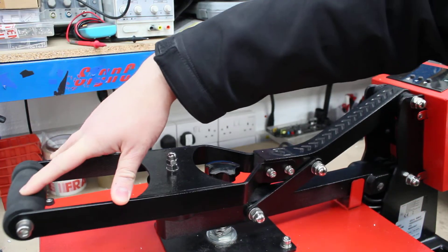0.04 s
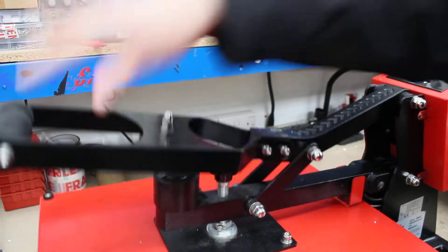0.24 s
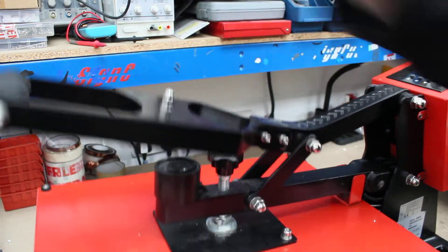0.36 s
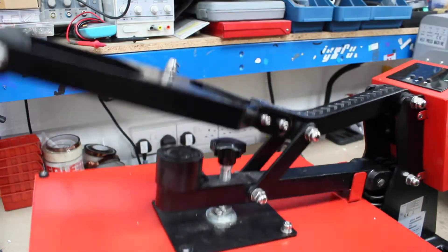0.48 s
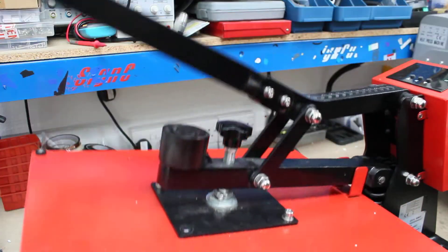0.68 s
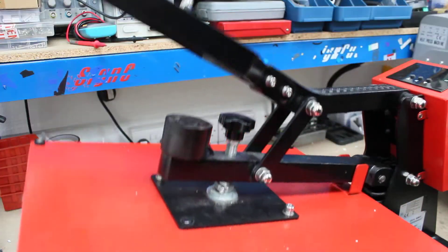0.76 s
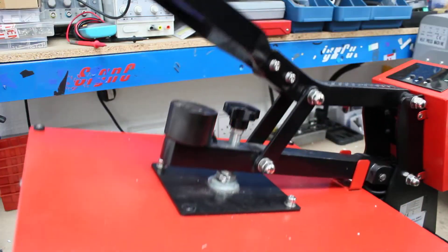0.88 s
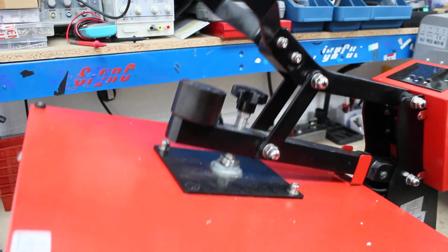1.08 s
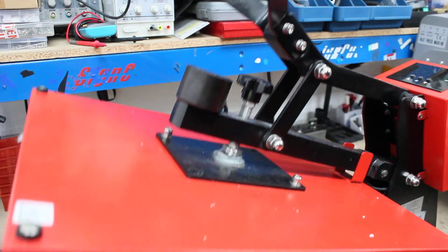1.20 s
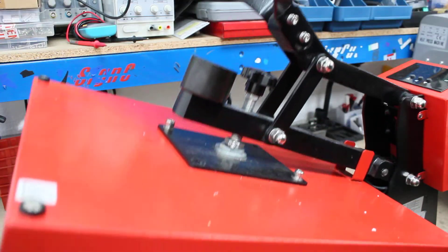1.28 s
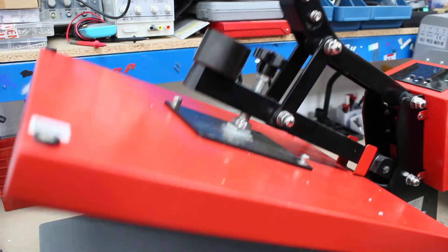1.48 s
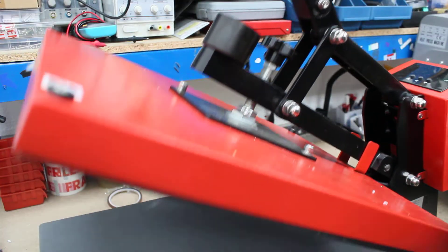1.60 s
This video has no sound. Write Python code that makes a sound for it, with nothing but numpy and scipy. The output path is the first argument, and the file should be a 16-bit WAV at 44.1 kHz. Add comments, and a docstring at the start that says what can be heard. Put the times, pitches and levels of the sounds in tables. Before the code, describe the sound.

A heat press springs open with a loud metal clunk, then lighter clicks and knocks.

```python
"""A heat press opening

A clamshell heat press opens close to the microphone in a small workshop. The handle's linkage
slips and snaps over centre; the impact excites the modes of the steel frame, and the clunk clips.
The rising handle clicks, squeaks and knocks at its pivots while the struts lift the platen with
a hiss and faint falling whistles."""
import sys
import numpy as np
from scipy import signal
from scipy.fft import rfft, irfft
from scipy.io import wavfile

SR = 44100
rng = np.random.default_rng(int(sys.argv[2]) if len(sys.argv) > 2 else 0)


def dump(signal):
    """Clip the signal to [-1, 1] and save it as 16-bit WAV at the path in sys.argv[1]."""
    limited = np.clip(np.atleast_2d(signal).T, -1, 1)
    pcm = np.round(limited * 32767).astype(np.int16)
    wavfile.write(sys.argv[1], SR, pcm)


N = 72765
T = np.arange(N) / SR

# Noise spectra of the workshop air, strut hiss, pivot friction and frame groan.
# Each row: frequency in Hz, relative spectral density in dB.
AIR_SPECTRUM = [(20, 9), (45, -7.5), (110, 1), (300, -0.5), (700, -4.5), (1500, -12.5), (4000, -28.5),
                (8000, -38), (16000, -29)]
HISS_SPECTRUM = [(200, -22), (2500, 3), (5000, -1), (6500, -0.5), (6950, 6), (7400, -1.5), (8500, 0.5),
                 (9000, 3), (9700, -2), (10800, -3), (11800, 0), (16000, -8.5)]
RUB_SPECTRUM = [(50, -44), (150, -3.5), (320, 1), (600, -8), (1100, -6), (2800, -12), (5000, -18),
                (16000, -49.5)]
GROAN_SPECTRUM = [(40, -29), (80, 8), (170, 7), (300, -12), (600, -16), (3000, -53)]
# Envelopes of the last three. Each row: time in seconds, level in dB.
HISS_LEVEL = [(0, -68), (.2, -63), (.42, -59.5), (.58, -54), (.8, -55), (1.05, -59), (1.22, -57.5),
              (1.35, -59), (1.65, -57)]
RUB_LEVEL = [(0, -53.5), (.11, -57.5), (.14, -53.5), (.19, -45.5), (.3, -40), (.56, -50.5), (.62, -48),
             (.73, -46.5), (.79, -50), (.84, -54), (.92, -57), (1.3, -57), (1.5, -53), (1.65, -53.5)]
GROAN_LEVEL = [(.15, -62), (.17, -56), (.194, -37.5), (.202, -22), (.212, -31), (.23, -67)]

# Strut whistles. Each row: midpoint in seconds, length in seconds, pitch in Hz, level in dB.
WHISTLES = [(.62, .14, 12150, -66), (.835, .12, 5230, -58.5), (1.01, .16, 4690, -67),
            (1.145, .09, 4380, -58), (1.18, .12, 11750, -65), (1.235, .13, 4210, -60),
            (1.23, .16, 12600, -65), (1.345, .11, 3990, -62), (1.445, .15, 3770, -61.5),
            (1.61, .16, 3500, -61), (.99, .16, 14350, -71)]
# Course of the pivot squeak. Each row: time in seconds, pitch in Hz, level in dB.
SQUEAK_PATH = [(.61, 3186, -60), (.62, 3060, -45.5), (.628, 2904, -53), (.645, 2860, -55),
               (.665, 2880, -41), (.673, 2820, -50), (.68, 2630, -50), (.69, 2450, -68)]
# Slips of the linkage, then its blows. Each row: start in seconds, relative level in dB.
SLIPS = [(.172, -30), (0.1805, -30), (0.1968, -46)]
BLOWS = [(0.1981, -24.5), (0.2002, -21), (0.2038, 0.5), (.2066, -5)]

# Normal modes of the link pin, handle, hinge and steel frame.
# Each row: frequency in Hz, relative level in dB, time to decay by 60 dB (T60) in seconds.
PIN_MODES = [(1930, -16, 0.15), (3070, -12, 0.12), (3550, -8, 0.12), (4180, -11, 0.08), (5070, -1, 0.056),
             (6620, 2, 0.029), (7350, -2, 0.036), (8090, -21, 0.046), (9560, -1, 0.047)]
HANDLE_MODES = [(291, -8.5, 0.15), (1060, -5.5, .17), (3070, -7.5, .07), (3343, -0.5, 0.042),
                (3570, -4, 0.089), (3850, -12, .06)]
HINGE_MODES = [(273, -0.5, 0.14), (1002, -12.5, 0.18), (1590, -18, 0.094), (1847, -10, 0.079),
               (2215, -8, 0.11), (3210, -0.5, 0.062), (3415, -7, 0.054)]
FRAME_MODES = [(78.5, -33, 0.75), (208.5, -9, 0.17), (277, -19, 0.12), (366.6, -10.5, 0.075),
               (437, -28, 0.5), (484, -17, 0.08), (686.7, -19.5, 0.09), (790.4, -10.5, 0.0614),
               (931, -8, 0.075), (986, -19.5, 0.21), (1174, -18, 0.061), (1350, -17, 0.061),
               (1568, -20, 0.17), (1760, -6.5, 0.035), (2056, -11.5, 0.031), (2615, -22, 0.1),
               (3510, -23, 0.046), (4266, -15.5, 0.032), (4607, -17, 0.022), (6880, -26, 0.035)]

# Dense responses of the room, the three joints, a slip, a blow's first crack and the frame's covers.
# Each row: frequency in Hz, relative spectral density in dB, T60 in seconds.
ROOM_BANDS = [(50, 9, 0.99), (119, 8, 0.28), (288, -1.5, 0.42), (1000, -0.5, 1), (1990, -6.5, 1),
              (4500, -8, 0.73), (8000, 5, 0.16), (16000, 6.5, 0.2)]
PIN_BANDS = [(200, -16, .05), (1500, -11.5, 0.11), (2800, -5, 0.15), (5000, -4.5, 0.099),
             (9900, -0.5, 0.045), (11500, -13, 0.059), (16200, -8.5, .04)]
HANDLE_BANDS = [(150, -21, .1), (1160, -4, 0.13), (1990, -10, 0.14), (3480, 4, 0.1), (4800, -16, .06),
                (16000, -22, .04)]
HINGE_BANDS = [(130, -37, 0.087), (282, 5.5, 0.2), (600, -1.5, 0.32), (1190, -2, 0.19), (2610, -7.5, 0.18),
               (3400, -2, 0.12), (4650, -10.5, 0.1), (6500, -29, 0.055), (16000, -40, 0.05)]
SLIP_BANDS = [(60, -4, .1), (300, -18, .1), (1200, -9, 0.11), (4440, -1.5, 0.085), (6300, -2.5, 0.054),
              (7950, 8.5, 0.039), (9800, -8, 0.075), (12500, -9, 0.091), (16000, -20, .05)]
CRACK_BANDS = [(60, -18, 0.03), (302, -7, 0.018), (1770, -1, 0.035), (3060, -6, 0.0095), (4440, 0, 0.02),
               (6000, -27, 0.0094), (16000, -50, 0.0071)]
CLATTER_BANDS = [(40, -28, .15), (130, -0.5, 0.21), (370, 1, 0.14), (700, -0.5, 0.12), (1220, -0.5, 0.064),
                 (2770, -18, 0.12), (4500, -8.5, 0.059), (6450, -15.5, 0.056), (10200, -25, 0.038),
                 (12400, -24, 0.067), (16000, -49, .04)]


def amp(db):
    """Amplitude grows tenfold for every 20 dB."""
    return 10 ** (np.asarray(db) / 20)


def unit(x):
    """Normalisation to an rms of 1."""
    return x / np.sqrt(np.mean(x ** 2) + 1e-20)


def curve(rows, column=1):
    """Linear interpolation of one column over time."""
    rows = np.array(rows)
    return np.interp(T, rows[:, 0], rows[:, column])


def over_hz(rows, values):
    """Interpolation of one value per row over log frequency."""
    hz = np.fft.rfftfreq(N, 1 / SR)
    return np.interp(np.log(hz + 1), np.log([row[0] for row in rows]), values)


def noise(rows):
    """Random phases under a given spectrum sum to noise, here of rms 1."""
    gain = amp(over_hz(rows, [row[1] for row in rows]))
    return unit(irfft(gain * np.exp(2j * np.pi * rng.random(len(gain))), N))


def wander(rate_hz):
    """Low-passed noise gives a random fluctuation of rms 1."""
    hz = np.fft.rfftfreq(N, 1 / SR)
    return unit(irfft(rfft(rng.standard_normal(N)) / (1 + (hz / rate_hz) ** 4), N))


def tone(hz):
    """A sine of rms 1 whose phase is the integral of its frequency."""
    return np.sqrt(2) * np.sin(2 * np.pi * np.cumsum(hz) / SR)


def delayed(x, start_s):
    """A shift in time to a later onset."""
    return np.concatenate([np.zeros(round(start_s * SR)), x])[:N]


def ring(modes):
    """Free vibration is a sum of damped modes, here of alternating sign."""
    return sum((-1) ** k * amp(db - 60 * T / t60) * np.sin(2 * np.pi * hz * T)
               for k, (hz, db, t60) in enumerate(modes))


def dense_ring(rows):
    """Overlapping modes merge into noise, each band decaying at its own rate."""
    spectrum = rfft(noise(rows))
    return sum(irfft(spectrum * over_hz(rows, band), N) * amp(-60 * T / t60)
               for band, (_, _, t60) in zip(np.eye(len(rows)), rows))


def air(hum_hz=114, width_hz=8.7):
    """Steady room noise carries a low hum, spread into a narrow band by random modulation."""
    phase = 2 * np.pi * hum_hz * T
    hum = unit(wander(width_hz) * np.cos(phase) + wander(width_hz) * np.sin(phase))
    return amp(-51) * noise(AIR_SPECTRUM) + amp(-61) * hum


def room(x, rise_s=.0064):
    """Reverberation is convolution with the workshop's diffuse impulse response."""
    tail = dense_ring(ROOM_BANDS) * np.minimum(T / rise_s, 1)
    return amp(-14.5) * signal.fftconvolve(x, tail / np.linalg.norm(tail))[:N]


def whistle(middle_s, length_s, hz, db, octaves_per_s=.6, flutter_db=3):
    """A strut's thin tone glides downward under a parabolic envelope."""
    pitch = hz * 2 ** (-octaves_per_s * (T - middle_s)) * (1 + .011 * wander(258))
    swell = np.maximum(1 - (2 * (T - middle_s) / length_s) ** 2, 0)
    return swell * amp(db + flutter_db * wander(43)) * tone(pitch)


def struts():
    """The extending struts radiate broadband hiss and intermittent whistles."""
    hiss = amp(curve(HISS_LEVEL)) * noise(HISS_SPECTRUM)
    return hiss + sum(whistle(*row) for row in WHISTLES)


def pivot_rub(grain_db=1.8):
    """Sliding friction makes noise, given a grain by rapid amplitude modulation."""
    return amp(curve(RUB_LEVEL) + grain_db * wander(100)) * noise(RUB_SPECTRUM)


def pivot_squeak(jitter=.033, flutter_db=5, fade_s=.005):
    """Friction in a dry pivot sustains a rough, falling tone that swells twice."""
    pitch = curve(SQUEAK_PATH) * (1 + jitter * wander(290))
    level_db = curve(SQUEAK_PATH, column=2) + flutter_db * wander(120)
    gate = np.clip(np.minimum(T - SQUEAK_PATH[0][0], SQUEAK_PATH[-1][0] - T) / fade_s, 0, 1)
    return gate * amp(level_db) * tone(pitch)


def knock(modes, bands, start_s, modes_db, bands_db, rise_s):
    """A joint drops into its play, and the impact excites both distinct and dense modes."""
    vibration = amp(modes_db) * ring(modes) + amp(bands_db) * dense_ring(bands)
    return delayed(np.minimum(T / rise_s, 1) * vibration, start_s)


def joints():
    """Three impacts: the link pin, the handle at the top of its swing, the hinge as the platen lifts."""
    pin = knock(PIN_MODES, PIN_BANDS, start_s=.5022, modes_db=-30, bands_db=-27, rise_s=.0003)
    handle = knock(HANDLE_MODES, HANDLE_BANDS, start_s=.7635, modes_db=-33, bands_db=-34, rise_s=.0003)
    hinge = knock(HINGE_MODES, HINGE_BANDS, start_s=1.3352, modes_db=-34, bands_db=-35.5, rise_s=.0012)
    return pin + handle + hinge


def linkage_slips():
    """Loaded steel slips in short bright scrapes, and the frame groans as the load comes off."""
    gate = (T > GROAN_LEVEL[0][0]) * (T < GROAN_LEVEL[-1][0])
    groan = gate * amp(curve(GROAN_LEVEL)) * noise(GROAN_SPECTRUM)
    return groan + sum(delayed(amp(db) * dense_ring(SLIP_BANDS), start_s) for start_s, db in SLIPS)


def platen_boom(start_s=.204, hz=115, rise_s=.062, t60=.36):
    """A low mode of the wide platen takes up the blow slowly, then decays freely."""
    swell = np.minimum(T / rise_s, 1) ** 2
    return delayed(swell * ring([(hz, -14.5, t60)]), start_s)


def platen_thump(middle_s=.2056, peak_hz=125):
    """The platen jumps off its pad and displaces air in one pressure pulse, a Ricker wavelet."""
    u = np.pi * peak_hz * (T - middle_s)
    return amp(-8) * (1 - 2 * u ** 2) * np.exp(-u ** 2)


def frame_ring():
    """The steel frame's modal responses to successive blows add by superposition."""
    response = amp(-3) * ring(FRAME_MODES)
    return sum(delayed(amp(db) * response, start_s) for start_s, db in BLOWS)


def linkage_clunk():
    """The linkage snaps over centre; each brief blow excites a broadband crack and rattles the covers."""
    clunk = np.zeros(N)
    for start_s, db in BLOWS:
        crack = amp(-8) * dense_ring(CRACK_BANDS)
        clatter = amp(-10.5) * dense_ring(CLATTER_BANDS)
        clunk += delayed(amp(db) * (crack + clatter), start_s)
    return clunk


def scene():
    """Direct sound, reverberation and room noise add at the microphone."""
    press = linkage_slips() + linkage_clunk() + platen_thump() + platen_boom()
    press += pivot_rub() + pivot_squeak() + struts() + joints()
    frame = frame_ring()
    reverberation = room(press + amp(-5) * frame)  # the frame is close, so more of it is heard direct
    return (press + frame + reverberation + air())[None]


def record(dry, low_hz=53, high_hz=15700):
    """The microphone acts as a high-pass; the clunk clips at full scale; a low-pass limits the band."""
    highpass = signal.butter(2, low_hz, "highpass", fs=SR, output="sos")
    lowpass = signal.firwin(511, high_hz, window=("kaiser", 9), fs=SR)
    clipped = np.clip(signal.sosfilt(highpass, dry), -1, 1)
    return signal.oaconvolve(clipped, lowpass[None], "same")


dry = scene()
out = record(dry)
dump(out)
```